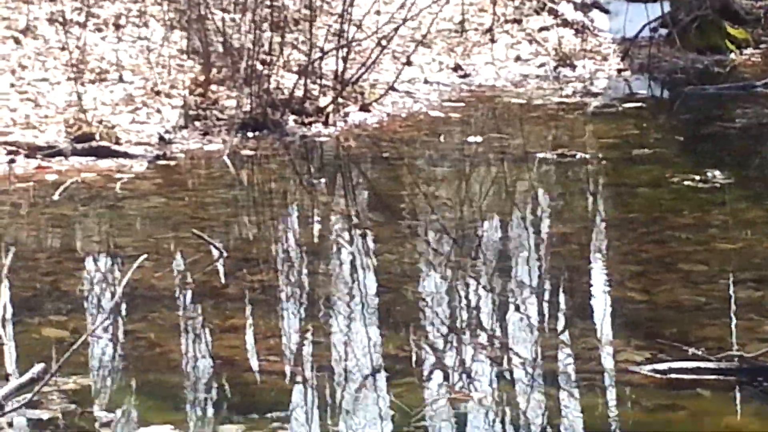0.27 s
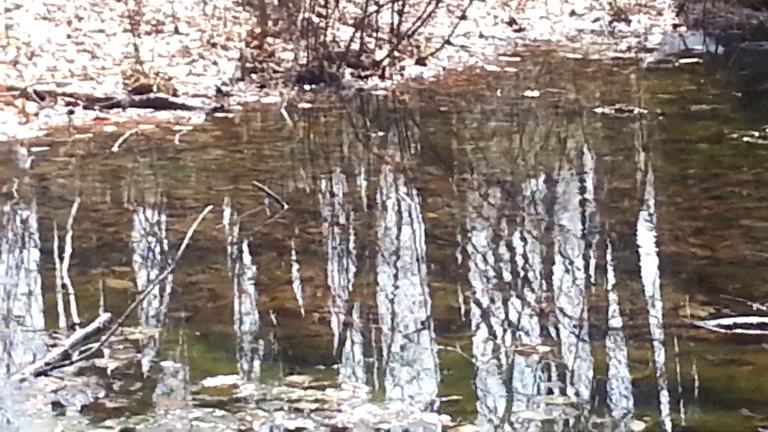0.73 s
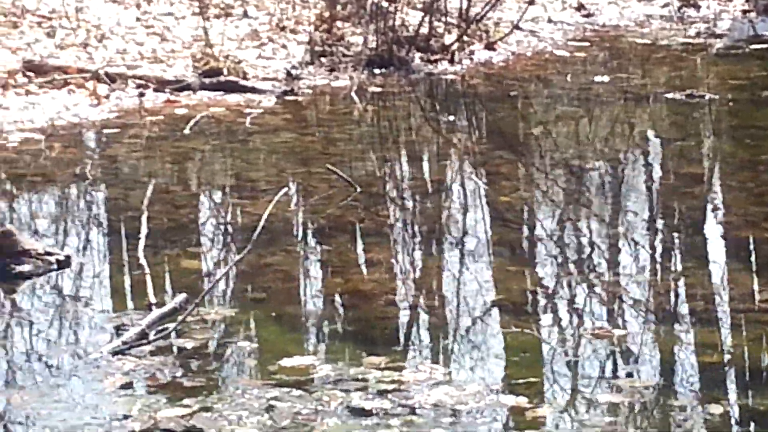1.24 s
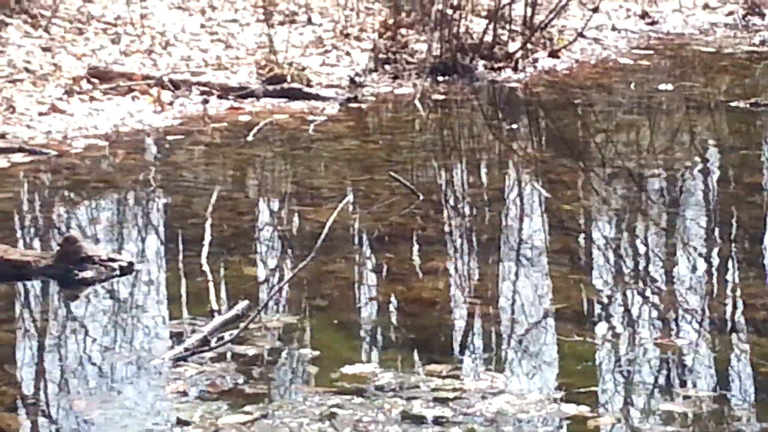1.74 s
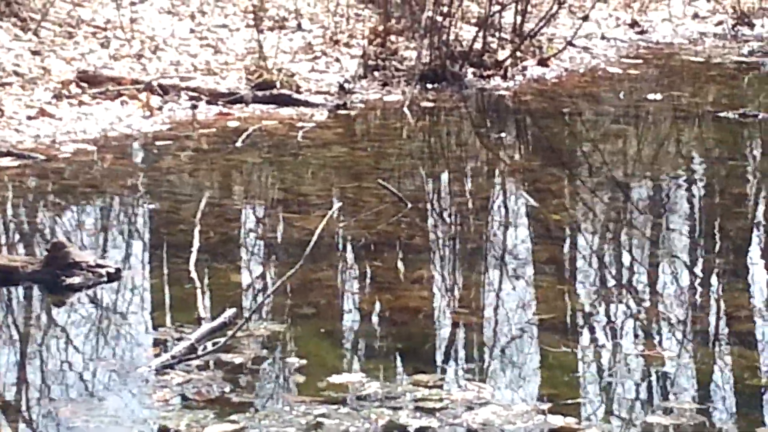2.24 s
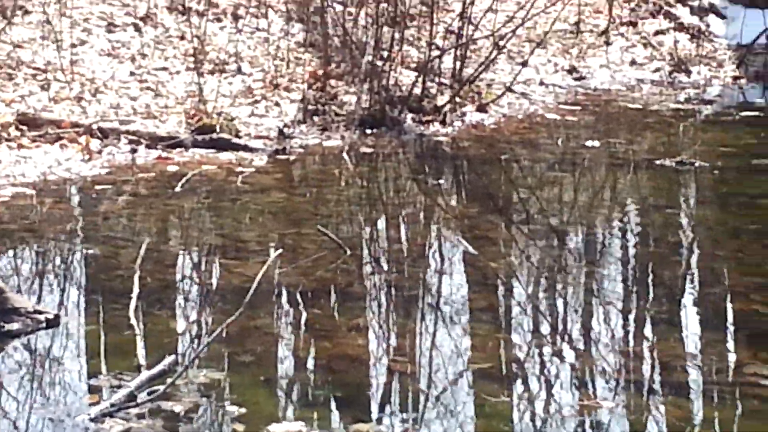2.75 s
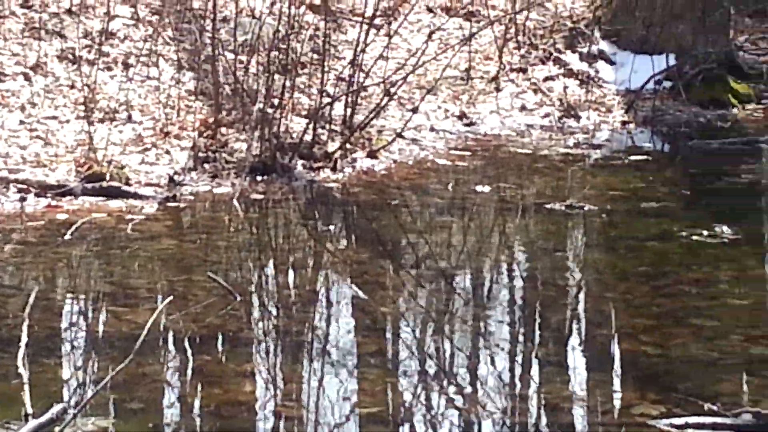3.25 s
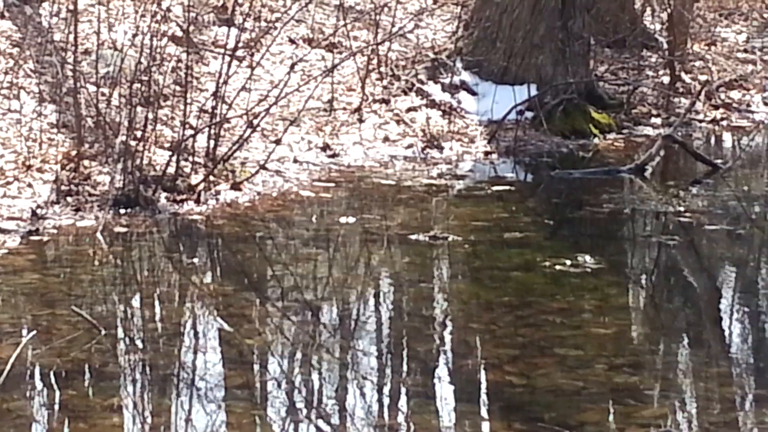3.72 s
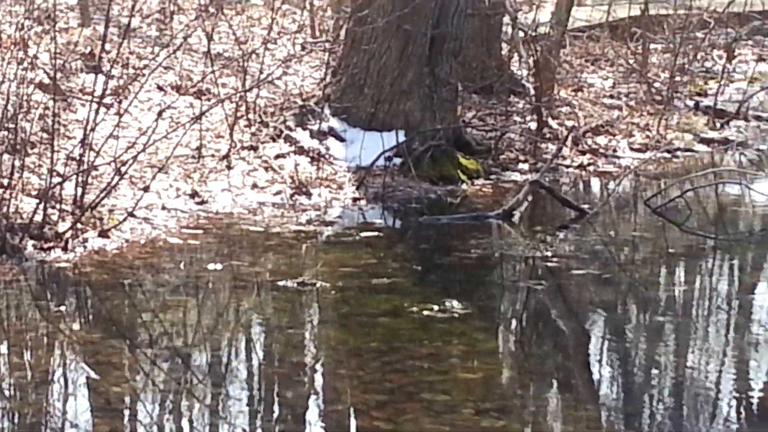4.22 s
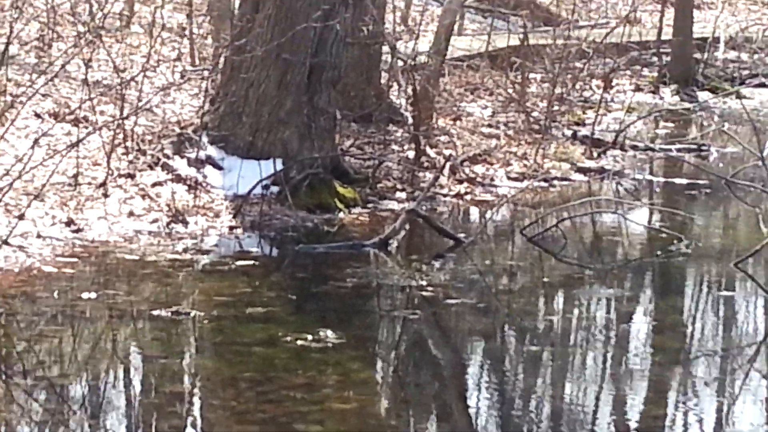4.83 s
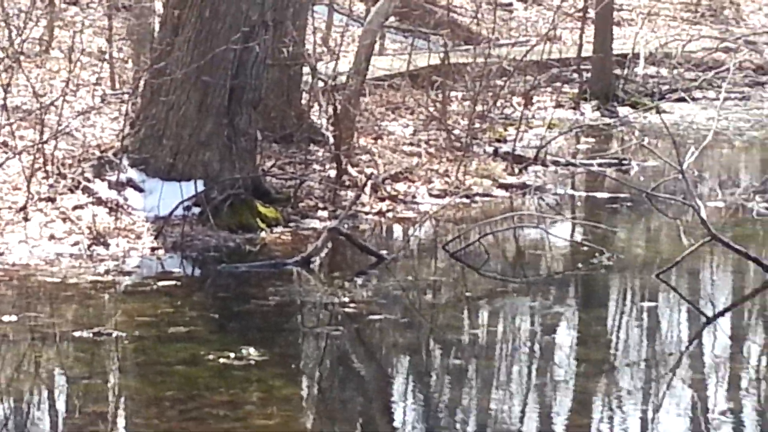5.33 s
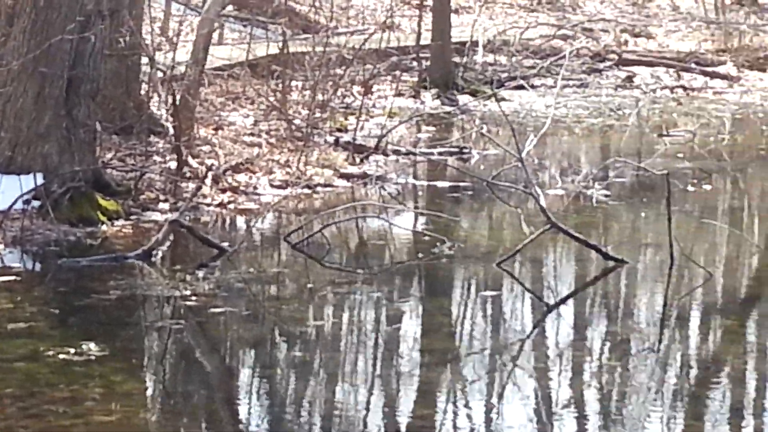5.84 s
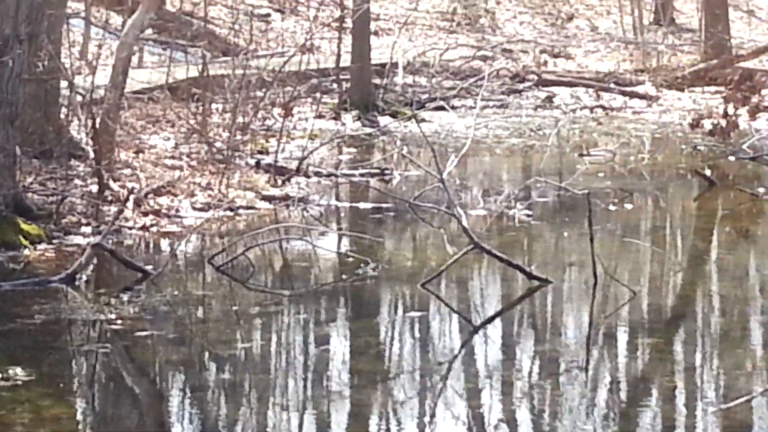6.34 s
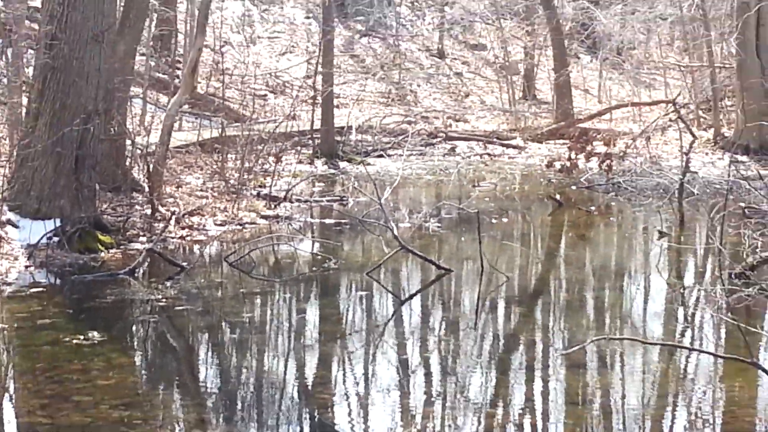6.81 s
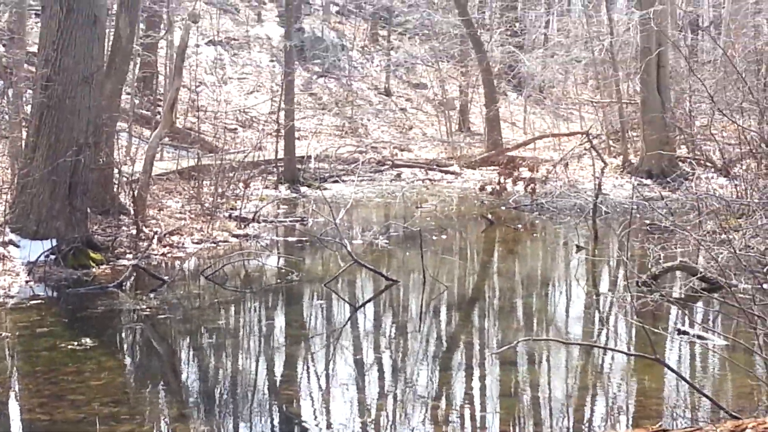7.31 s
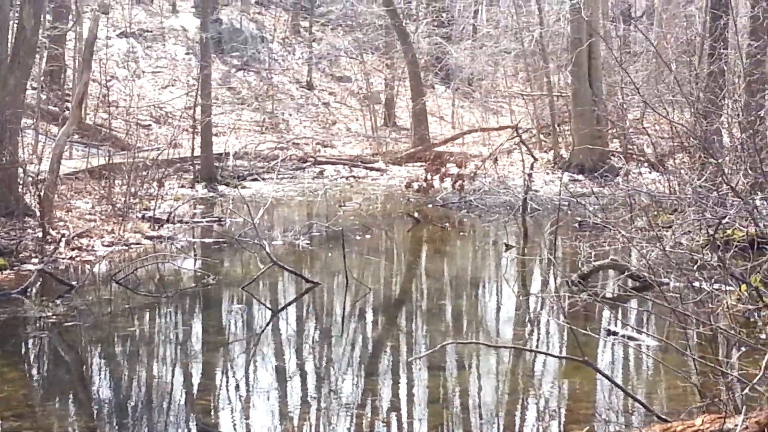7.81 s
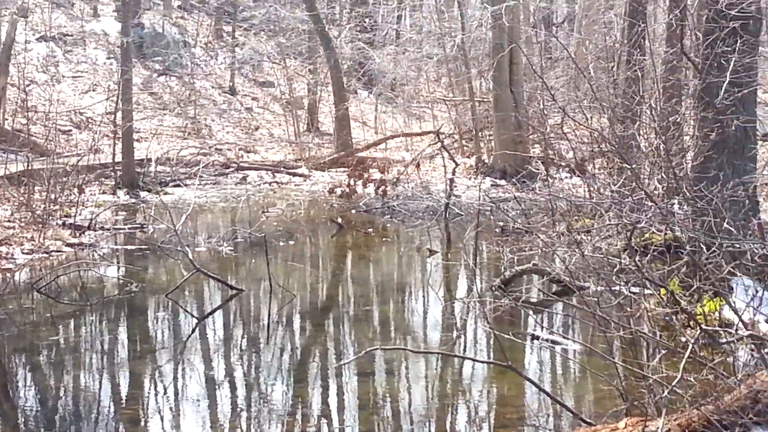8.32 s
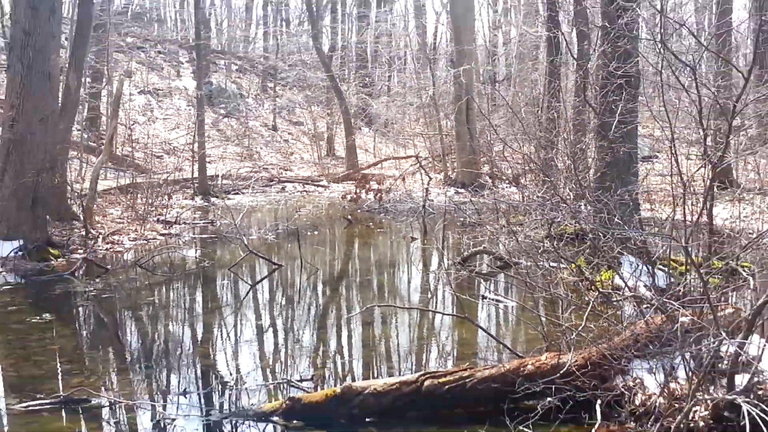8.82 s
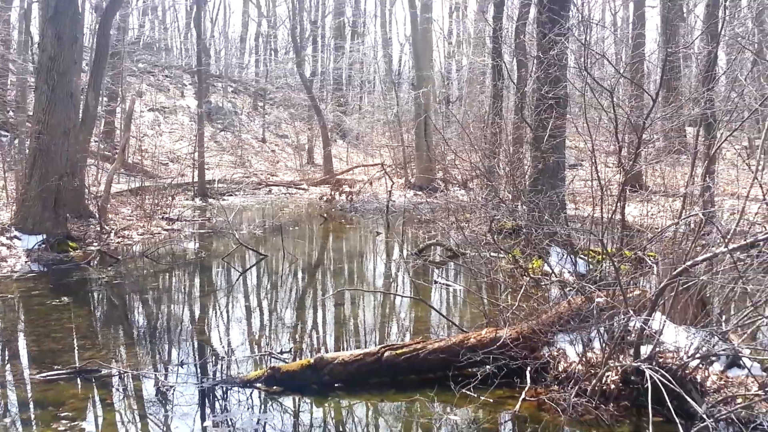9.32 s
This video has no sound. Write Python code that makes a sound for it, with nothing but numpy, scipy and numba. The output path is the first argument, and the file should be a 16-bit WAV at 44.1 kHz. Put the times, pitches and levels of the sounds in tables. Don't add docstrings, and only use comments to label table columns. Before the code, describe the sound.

Short, raspy, quacking frog calls overlap continuously from near and far across a quiet wooded pond, with soft thuds on the camera.

```python
import sys
import numpy as np
from scipy import signal
from scipy.fft import irfft, next_fast_len
from scipy.io import wavfile
from scipy.ndimage import uniform_filter1d
from numba import njit

SR = 44100
rng = np.random.default_rng(int(sys.argv[2]) if len(sys.argv) > 2 else 0)


def elevation(decibels):
    levels = np.asarray(decibels, float)
    return 10 ** (levels / 20)


def to_wav(sig):
    pcm = np.clip(np.atleast_2d(sig), -1, 1) * 32767
    pcm = np.round(pcm).astype(np.int16)
    wavfile.write(sys.argv[1], SR, pcm.T)


N = 421596

# start_s [s], level_db [dB], sac_hz [Hz], length_ms [ms]
REEDS_SLOW = [(0.168, -33, 1460, 38), (0.486, -24, 1510, 18), (0.589, -38, 1500, 65),
              (1.234, -33.5, 1640, 13), (1.262, -32.5, 1360, 31), (4.783, -31, 1260, 31),
              (5.188, -40, 1320, 24), (5.878, -37, 1560, 28), (6.319, -32.5, 1450, 46),
              (6.885, -31, 1280, 33), (7.618, -35, 1580, 16), (8.139, -32.5, 1500, 40),
              (9.332, -40, 1490, 22)]
REEDS_QUICK = [
    (0.709, -22, 1860, 31),
    (1.52, -25, 1450, 25),
    (2.443, -30, 1410, 14),
    (4.076, -39, 1840, 27),
]
BANK_QUICK = [(0.256, -27, 1520, 23), (0.783, -27, 1530, 22), (0.993, -29, 1330, 19.4),
              (1.488, -30, 1300, 33), (2.063, -33, 1340, 18), (2.474, -27.5, 1570, 29),
              (2.98, -30, 1410, 16), (3.872, -30, 1710, 45), (4.303, -33.5, 1490, 35),
              (4.418, -26.5, 1670, 35), (5.287, -29.5, 1370, 19), (5.388, -36, 1470, 62),
              (6.175, -33, 1420, 70), (6.79, -34.5, 1320, 14), (6.955, -38.5, 1390, 53)]
BANK_SLOW = [(0.0, -24, 1590, 18), (0.929, -28, 1400, 4.6), (1.422, -29, 1580, 46), (1.581, -28, 1500, 34),
             (1.727, -34, 1280, 21), (1.742, -24.5, 1490, 22.6), (2.154, -29, 1520, 29),
             (2.264, -24, 1670, 12.4), (2.597, -32.5, 1470, 20.7), (2.769, -28.5, 1720, 37),
             (3.194, -35, 1430, 33), (3.279, -30, 1730, 26), (3.371, -29.5, 1500, 18),
             (4.029, -29.5, 1550, 12.6), (7.3, -36.5, 1300, 82)]
STUMP_SLOW = [
    (0.1, -29, 1550, 22),
    (3.768, -26.5, 1600, 47),
    (4.143, -28.5, 1630, 30.6),
    (5.808, -27.5, 1400, 35.4),
    (6.229, -28, 1460, 62),
    (7.651, -31.5, 1380, 37),
]
STUMP_QUICK = [
    (4.497, -26, 1610, 36),
    (4.539, -35, 1480, 30),
    (4.581, -33.5, 1510, 22.2),
    (5.121, -32.5, 1500, 23),
    (5.412, -32.5, 1510, 21),
    (6.06, -30, 1530, 26),
    (8.726, -28.5, 1410, 25),
    (9.293, -32, 1530, 28),
]
NEAREST = [
    (0.827, -20.5, 1650, 23),
    (5.703, -30, 1450, 20),
    (7.347, -15, 1570, 17),
    (8.061, -25, 1470, 10),
    (8.421, -30, 1620, 3),
    (9.519, -29.5, 1450, 3),
    (9.53, -19.5, 1390, 19),
]
MIDDLE_QUICK = [
    (1.87, -18, 1600, 16.8),
    (3.566, -20, 1634, 24.6),
    (5.957, -24.5, 1650, 21.5),
    (7.025, -38.5, 1460, 20),
    (7.977, -29, 1450, 30.5),
    (8.198, -37, 1360, 54),
    (8.331, -31, 1520, 5),
    (8.596, -34, 1480, 23),
    (9.033, -35, 1620, 42),
]
MIDDLE_SLOW = [(4.702, -27, 1470, 25), (1.347, -36, 1410, 35), (1.799, -31, 1400, 21),
               (2.531, -38, 1550, 35), (6.643, -37, 1390, 15), (6.752, -28.5, 1390, 27),
               (7.102, -25.5, 1530, 35.5), (7.23, -22.5, 1610, 28), (7.746, -30, 1370, 25),
               (8.289, -27.5, 1540, 33), (8.647, -26, 1470, 35), (9.165, -31.5, 1460, 41)]
LOG = [
    (2.717, -35.5, 1460, 15),
    (5.506, -40, 1180, 42),
    (7.773, -32, 1460, 53),
    (9.132, -27.5, 1520, 15),
    (9.236, -21, 1500, 23.6),
    (9.424, -24.5, 1440, 27),
]
SHRILL = [
    (3.13, -30, 1610, 23),
    (3.342, -23, 1705, 26),
    (3.44, -31, 1600, 44),
]
BRIGHT = [
    (7.906, -25.5, 1540, 30),
    (8.701, -21.5, 1540, 24),
    (8.833, -24.5, 1570, 25.3),
    (0.366, -30, 1600, 50),
]
ABRUPT = [
    (8.432, -18.5, 1424, 18.6),
    (8.633, -29, 1500, 12),
    (5.627, -31.5, 1600, 27.4),
    (6.727, -33.5, 1440, 27),
    (5.347, -34.5, 1300, 30),
    (1.848, -38.5, 1440, 8.8),
]
# (throat_hz [Hz], throat_db [dB], overtone_hz [Hz], overtone_db [dB], swell_ms [ms])
CALLERS = [(REEDS_SLOW, 6.0, -0.4, (691, -11.5, 2600, -27, 17)),
           (REEDS_QUICK, 3.1, -0.34, (889, -21.5, 2640, -18.5, 13)),
           (BANK_QUICK, 3.5, -0.24, (752, -18, 2750, -12, 11)),
           (BANK_SLOW, 5.2, -0.23, (810, -17.5, 4550, -20, 7.5)),
           (STUMP_SLOW, 5.5, -0.12, (760, -20.5, 2800, -12.5, 11.5)),
           (STUMP_QUICK, 3.6, -0.074, (801, -18.5, 4202, -16, 12)),
           (NEAREST, 6.4, -0.065, (675, -15, 3200, -25.5, 2)),
           (MIDDLE_QUICK, 3.8, 0.048, (803, -15.5, 2900, -11.5, 13.5)),
           (MIDDLE_SLOW, 5.4, 0.058, (729, -17, 5003, -22, 13)),
           (LOG, 4.6, 0.23, (782, -17.5, 5400, -19, 13.5)),
           (SHRILL, 5.5, -0.099, (800, -17, 4200, 3.5, 14)), (BRIGHT, 4.2, 0.15, (790, -16, 2950, 5.5, 9)),
           (ABRUPT, 4.0, -0.06, (800, -15.5, 2800, -25, 0.5))]
# time_s [s], level_db [dB]
FAR_EFFORT = [(0.0, -41), (0.45, -39), (0.9, -43), (1.09, -42.5), (1.65, -40.5), (2.5, -43), (3.09, -40.5),
              (3.49, -36.5), (4.26, -45.5), (4.63, -37.5), (4.95, -48.5), (5.46, -39.5), (6.3, -38.5),
              (6.6, -45.5), (7.2, -32), (7.45, -51), (7.83, -40.5), (9.56, -38)]
# pitch_hz [Hz], decay_ms [ms], level_db [dB]
RASP = [(2050, 0.35, -25), (3330, 0.6, -17.5), (4170, 0.43, -19.5), (5020, 0.91, -29.5)]
# start_s [s], length_s [s], level_db [dB], low_hz [Hz], high_hz [Hz]
SCUFFS = [
    (6.021, .09, -46, 2800, 8500),
    (6.69, .1, -57, 2600, 5500),
    (4.64, .025, -54, 3500, 5500),
    (4.962, .02, -48, 3000, 4600),
]
# start_s [s], peak_db [dB], pitch_hz [Hz], length_ms [ms]
BUMPS = [
    (4.531, -37, 180, 49),
    (4.555, -28, 250, 33),
    (7.27, -42, 60, 24),
    (8.59, -28, 93, 15),
    (8.679, -38, 71, 27),
    (9.135, -32, 98, 14),
]
# pitch_hz [Hz], density_db [dB per Hz]
AIR_COLOUR = [(18, -57.5), (30, -39), (43, -13.5), (153, -7.5), (307, -7), (429, -10.5), (683, -3),
              (1060, -9.5), (1560, -5.5), (2360, -17.5), (2820, -22), (4980, -25.5), (6290, -30.5),
              (8350, -27), (14400, -26.5)]
# pitch_hz [Hz], likeness [0-1]
AIR_ALIKE = [(60, 0.51), (600, 0.54), (1400, 0.19), (14000, 0)]
# pitch_hz [Hz], left_minus_right_db [dB]
AIR_BALANCE = [(30, -1.5), (70, 0.5), (140, 0.5), (300, -0.5), (14000, 0.2)]

SAC_MS, THROAT_MS, OVERTONE_MS = 1.6, 2.43, 1.46
CHEEK_RATIO, CHEEK_DB, CHEEK_MS = 1.178, -13, 2.2
RISE_MS = 0.33
REBOUND_DB, REBOUND_AT = -5.5, 0.4714
FAR_THROAT_HZ, FAR_THROAT_DB = 682, -16
FAR_MEAN_DB, LULL_THROAT = -46, 0.5
TREES_T60_S, TREES_DB, FAR_WET_DB = 0.18, -13.5, -6
AIR_DB = -48.5


def near_frogs():
    calls, voices = [], []
    for rows, gap_ms, lag_ms, voice in CALLERS:
        for start_s, level_db, sac_hz, length_ms in rows:
            calls.append((start_s, level_db, sac_hz, gap_ms, length_ms, lag_ms))
            voices.append(voice)
    return elevation(10.5) * clucks(calls, voices, jitter=0.0822, scatter_db=2.0, count=26)


def clucks(calls, voices, jitter, scatter_db, count):
    start, db, hz, gap_ms, length_ms, lag_ms = (c[:, None] for c in np.transpose(calls))
    throat_hz, throat_db, over_hz, over_db, swell_ms = (c[:, None] for c in np.transpose(voices))
    beat, size, tune, low = np.split(rng.standard_normal((len(calls), 4 * count)), 4, axis=1)

    k = np.arange(count) - count // 5
    pace = np.maximum(1.1 - .03 * k, .75)
    since_ms = gap_ms * (k * pace + jitter * beat * (k != 0))
    part = since_ms / length_ms
    within = np.clip(part, 0, 1)
    sounds = (part < 1.4) & (since_ms > -swell_ms - 3)
    when = start + since_ms / 1000

    soft_start_db = -7 * np.clip(swell_ms / 8, 0, 1) * np.clip(1 - part / 0.42, 0, 1)
    rise_db = soft_start_db + 14 * np.minimum(since_ms, 0) / np.maximum(swell_ms + 2, 1)
    shape_db = rise_db - 15 * np.maximum(part - .4, 0) + scatter_db * size

    sac_hz = hz * (1.03 - 0.052 * within + 0.026 * tune)
    cheek_hz = CHEEK_RATIO * np.sqrt(sac_hz * throat_hz)
    late_throat_hz = throat_hz * (1.03 - 0.068 * part + 0.017 * low)
    late_throat_db = throat_db + 7 * (within - .6) + 1.2 * low
    overtone_db = over_db - 11.5 - 0.44 * rise_db - 5 * part
    # (Hz, dB against the sac, decay ms, polarity)
    modes = [(sac_hz, 0, SAC_MS, 1),
             (cheek_hz, CHEEK_DB, CHEEK_MS, 1),
             (late_throat_hz, late_throat_db, THROAT_MS, -1),
             (over_hz * sac_hz / hz, overtone_db, OVERTONE_MS, 1)]
    for rasp_hz, ms, rasp_db in RASP:
        early_db = rasp_db - rasp_hz / 9000 * (rise_db + 8 * part)
        modes.append((rasp_hz * np.sqrt(sac_hz / 1550), early_db, ms, 1))

    rebound_s = gap_ms * (REBOUND_AT + 0.088 * low) / 1000
    rebound = elevation(REBOUND_DB + 9.2 * (within - .5) + 2.0 * beat)
    out = np.zeros((2, N))
    for mode_hz, mode_db, ms, sign in modes:
        gain = sign * elevation(db + shape_db + mode_db)
        pitch = mode_hz[sounds]
        for ear, side in zip(out, (1, -1)):
            arrives = when + side * lag_ms / 2000
            add_pulses(ear, arrives[sounds], gain[sounds], pitch, 1. * ms, RISE_MS)
            again = (arrives + rebound_s)[sounds]
            add_pulses(ear, again, (gain * rebound)[sounds], pitch, 1. * ms, RISE_MS)
    return out * elevation([[-.5], [.5]])


@njit
def add_pulses(out, when, gain, hz, ms, rise_ms):
    closing = np.exp(-1000 / SR / rise_ms)
    for k in range(len(when)):
        first = max(int(when[k] * SR) + 1, 0)
        pole = 2j * np.pi * hz[k] - 1000 / ms
        t = first / SR - when[k]
        z = gain[k] * np.exp(pole * t)
        step = np.exp(pole / SR)
        gap = np.exp(-1000 * t / rise_ms)
        for i in range(first, min(first + int(6 * ms * SR / 1000), len(out))):
            push = 1 - gap
            out[i] += push * push * push * z.imag
            z, gap = z * step, gap * closing


def crowd(count):
    spot = rng.random((count, 8)).T
    start = (np.arange(count) + spot[0]) * N / SR / count
    far_db = np.interp(start, *np.transpose(FAR_EFFORT))
    level_db = far_db + 12.5 - 6 * spot[3]
    sac_hz = 1250 + 450 * spot[4]
    gap_ms = 3.6 + 2.6 * spot[1]
    length_ms = np.full(count, 30.0)
    lag_ms = 0.77 * (spot[2] - .55)
    calls = [start, level_db, sac_hz, gap_ms, length_ms, lag_ms]

    throat_hz = FAR_THROAT_HZ * (0.94 + 0.18 * spot[5])
    throat_db = FAR_THROAT_DB + LULL_THROAT * (FAR_MEAN_DB - far_db)
    over_hz = 2700 + 2500 * spot[6]
    over_db = np.full(count, -36.0)
    swell_ms = 12 * spot[7]
    voices = [throat_hz, throat_db, over_hz, over_db, swell_ms]
    return clucks(np.transpose(calls), np.transpose(voices), jitter=0.1168, scatter_db=1.0, count=12)


def trees(x):
    t = np.arange(SR // 2) / SR
    fade = elevation(-60 * t / TREES_T60_S) * (1 - np.exp(-t / 0.00067))
    tail = rng.standard_normal((2, len(t))) * fade
    tail = signal.lfilter([.4], [1, -.6], tail)
    tail = tail / np.sqrt(np.sum(tail ** 2, axis=1, keepdims=True))
    return signal.fftconvolve(x.mean(axis=0, keepdims=True), tail, axes=1)[:, :N]


def scuffs():
    out = np.zeros((2, N))
    t = np.arange(SR // 5) / SR
    for start, length, db, low_hz, high_hz in SCUFFS:
        uneven_db = 2.8 * np.repeat(rng.exponential(size=len(t) // 20), 20)
        crackle = rng.standard_normal((2, len(t))) * elevation(uneven_db)
        leaf = signal.butter(3, [low_hz, high_hz], "band", fs=SR, output="sos")
        band = unit(signal.sosfilt(leaf, crackle))
        fade = np.clip(np.minimum(t, length - t) / .012, 0, 1)
        out[:, int(start * SR):][:, :len(t)] += elevation(db) * band * fade
    return out


def bumps():
    out = np.zeros((2, N))
    for start, db, hz, ms in BUMPS:
        for ear, late_s, side_db in zip(out, (0, .002), (8, 3)):
            when = np.array([start + late_s])
            add_pulses(ear, when, elevation([db + side_db]), np.array([1. * hz]), ms / 3, ms / 6)
    return out


def air():
    size = next_fast_len(N)
    hz = np.maximum(np.fft.rfftfreq(size, 1 / SR), 1)
    common, *own = rng.standard_normal((3, len(hz))) + 1j * rng.standard_normal((3, len(hz)))
    alike = np.clip(on_log(AIR_ALIKE, hz), 0, 1)
    balance_db = np.array([[.5], [-.5]]) * on_log(AIR_BALANCE, hz)
    colour = elevation(on_log(AIR_COLOUR, hz) + balance_db)
    mixed = np.sqrt(alike) * common + np.sqrt(1 - alike) * np.array(own)
    noise = irfft(colour * mixed, size)
    return elevation(AIR_DB) * unit(noise[:, :N])


def unit(x):
    return x / np.sqrt(np.mean(x ** 2))


def on_log(table, hz):
    table_hz, value = np.transpose(table)
    return np.interp(np.log(hz), np.log(table_hz), value)


def scene():
    near, far = near_frogs(), crowd(count=290)
    frogs = near + far + trees(elevation(TREES_DB) * near + elevation(FAR_WET_DB) * far)
    frogs = signal.sosfilt(signal.butter(4, 490, "high", fs=SR, output="sos"), frogs)
    return frogs + scuffs() + bumps() + air()


def band_limit(x):
    return signal.sosfilt(signal.butter(12, 14520, fs=SR, output="sos"), x)


def record(dry):
    x = signal.sosfilt(signal.butter(1, 45, "high", fs=SR, output="sos"), dry)
    level_db = 10 * np.log10(uniform_filter1d(np.mean(x ** 2, axis=0), 5000) + 1e-12)
    quiet_db = 0.23 * np.minimum(level_db + 39.5, 0)
    return band_limit(x * elevation(quiet_db))


dry = scene()
out = record(dry)
to_wav(out)
```